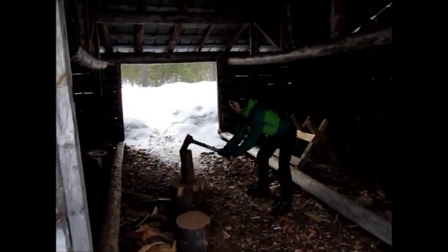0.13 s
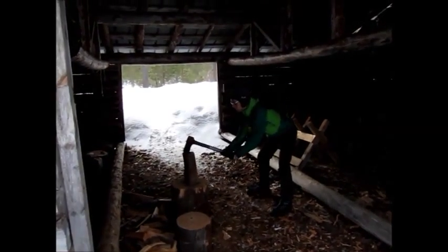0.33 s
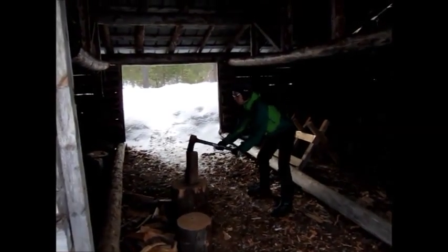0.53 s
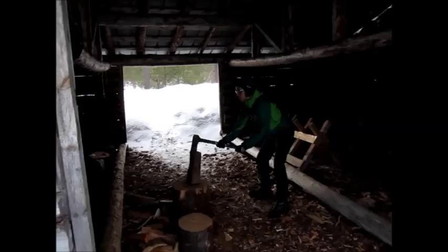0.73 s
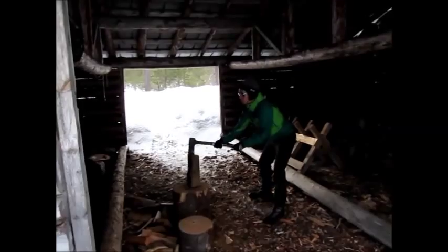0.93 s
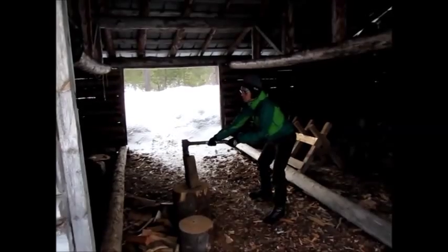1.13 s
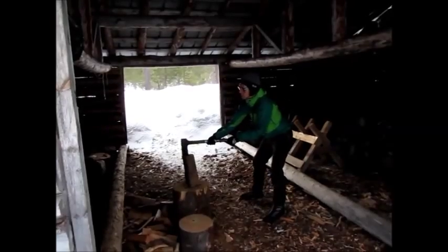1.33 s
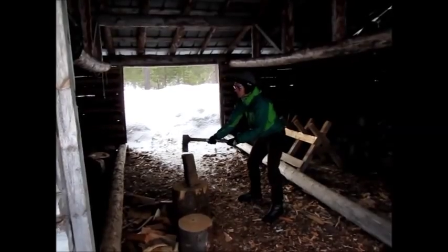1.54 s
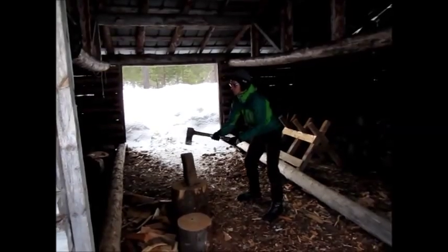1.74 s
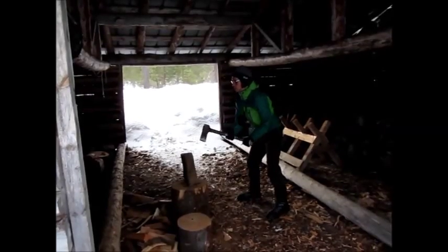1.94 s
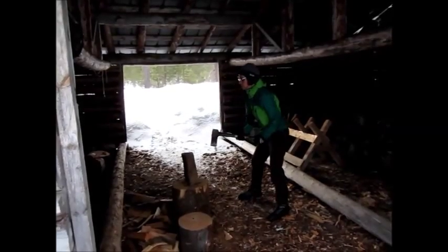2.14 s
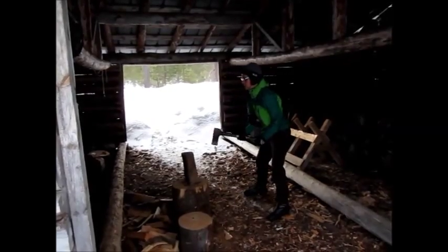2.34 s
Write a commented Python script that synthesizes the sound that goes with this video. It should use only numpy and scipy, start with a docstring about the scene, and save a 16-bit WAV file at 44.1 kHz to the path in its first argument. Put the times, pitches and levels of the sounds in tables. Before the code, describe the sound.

A sharp axe blow cracks into a log with a woody thud and short shed echo, then dry knocks as the wedged blade is levered free, ending with jacket rustle, scrapes and footsteps on bark litter.

```python
"""Wind rumble (deep filtered noise), hiss and a faint drone (noise bands) lie under an open woodshed.
An axe bites into a log on a chopping block: decaying sine tones and torn-fibre noise, echoing in the shed.
The recorder's gain ducks at the blow and creeps back, lifting the background.
Then the stuck blade is levered free with short damped knocks, among snaps of filtered noise.
Last, a jacket swishes and feet shift on bark litter: grainy noise, scrapes, crackles and dull bumps."""
import sys
import numpy as np
from scipy import signal
from scipy.io import wavfile
from scipy.ndimage import minimum_filter1d

SR = 44100
rng = np.random.default_rng(int(sys.argv[2]) if len(sys.argv) > 2 else 0)


def generate_wav(sig):
    """Save sig (samples, or channels by samples) to the path in sys.argv[1] as 16-bit PCM at SR."""
    pcm = np.round(np.clip(np.atleast_2d(sig).T, -1, 1) * 32767).astype(np.int16)
    wavfile.write(sys.argv[1], SR, pcm)


N = 105840
T = np.arange(N) / SR  # time of every sample in seconds

# Steady hiss. Each row: frequency in Hz, strength in dB per Hz (relative).
HISS_SPECTRUM = [(30, 11), (120, 6), (300, 3), (700, -9.5), (1200, -2.5), (1800, -13), (4000, -18),
                 (8000, -19.5), (16000, -27.5)]
HISS_DB = -47
# Narrow drone bands in the background. Each row: centre in Hz, width in Hz, level in dB.
DRONE_BANDS = [(947.95, 110, -51), (1202.5, 27, -58)]
# Wind on the microphone. Each row: time in seconds, level in dB.
WIND_LEVEL = [(0, -39), (.2, -45.5), (.55, -37), (1.0, -43), (1.85, -44.5), (2.03, -33), (2.2, -32.5),
              (2.4, -44.5)]
# Colour of the wind. Each row: frequency in Hz, strength in dB per Hz (relative).
WIND_SPECTRUM = [(14, 4), (30, -5), (60, -14.5), (120, -29.5), (300, -46), (1000, -72.5)]

# Jacket and boots rubbing. Each row: time in seconds, level in dB.
RUB_LEVEL = [(0, -41), (.07, -49), (.25, -58.5), (.42, -50.5), (.6, -49), (1.0, -48.5), (1.45, -50.5),
             (1.75, -54), (1.95, -47), (2.05, -47.5), (2.11, -41), (2.15, -45.5), (2.19, -49.5),
             (2.28, -43.5), (2.33, -59), (2.4, -42)]
# Colour of the rubbing. Each row: frequency in Hz, strength in dB per Hz (relative).
RUB_SPECTRUM = [(100, 3.5), (300, 2.5), (700, 12.5), (1500, 2.5), (3000, 4), (5000, -7.5), (8000, -14),
                (16000, -22.5)]
# Colour of one bright sleeve swish. Each row: frequency in Hz, strength in dB per Hz (relative).
SWISH_SPECTRUM = [(500, -28.5), (3000, -1), (6000, -5.5), (12000, -13), (16000, -22)]
SWISH_S, SWISH_WIDTH_S, SWISH_DB = 2.12, 0.03994, -46.5
# Tiny crackles of bark and fabric; their level is counted from the rubbing level.
CRACKLES_PER_S, CRACKLE_DB, CRACKLE_SPREAD_DB, CRACKLE_BAND_HZ = 110, 15, 3, (1300, 4800)

# Dull bumps of log and boots on the ground. Each row: start in seconds, level in dB.
BUMPS = [(0.279, -22), (0.778, -29.5), (1.195, -37.5), (1.491, -29), (1.973, -34.5), (2.176, -29),
         (2.343, -33)]
# Colour of the bumps. Each row: frequency in Hz, strength in dB per Hz (relative).
BUMP_SPECTRUM = [(40, 3), (100, -0.5), (220, -9.5), (400, -28), (700, -16), (3000, -71)]
BUMP_T60_S = 0.06656  # a T60 is the time to die away by 60 dB
# Gritty scrapes as the blade comes away and the boots shift.
# Each row: start in seconds, level in dB, T60 in seconds.
SCRAPES = [(1.870, -39.5, 0.03447), (1.9232, -32.5, 0.04303), (2.026, -35.5, 0.04754),
           (2.1703, -28, 0.02103)]
# Resonances of the scrapes. Each row: centre in Hz, width in Hz, level in dB.
SCRAPE_BANDS = [(834.64, 291.5, -4), (1554.2, 307.2, -6.5), (2572.5, 517.5, -6), (3053.3, 761.4, -6.5)]
SCRAPE_RISE_S, SCRAPE_GRAIN_DB, SCRAPE_GRAINS_PER_S = 0.001078, 4, 500
# Crisp snaps of single chips, and at 0.464 s a faint tink of the axe head. Each row: start in seconds, level in
# dB, centre in Hz, T60 in seconds.
CHIP_SNAPS = [(0.051, -40, 3240, 0.021), (0.283, -42, 3093, 0.0354), (0.305, -41, 3192, 0.02072),
              (0.464, -40.5, 2581, .06), (0.570, -36.5, 9040, 0.00936), (0.663, -31.5, 9342, 0.0137),
              (0.663, -31, 2580, 0.013), (0.7508, -32, 10060, 0.00527), (0.8035, -30, 2523, 0.02657),
              (0.879, -41.5, 3455, 0.10084), (0.932, -42, 11000, 0.02024), (0.977, -43.5, 3192, 0.0188),
              (1.055, -38.5, 12220, 0.01062), (1.28, -32.5, 4124, 0.009924), (1.375, -43, 5495, 0.03395),
              (1.483, -38.5, 3273, 0.04596), (1.491, -33.5, 1412, 0.12044), (1.493, -40.5, 7987, 0.01629),
              (1.534, -39.5, 9005, 0.00879), (2.062, -38, 4909, 0.01336), (2.387, -36, 3546, 0.03406)]
BURST_WIDTH = 1.7964  # band edges of snaps and splinters, as a ratio to the centre

# The wedged blade slips in the cleft.
# Each row: start in seconds, level in dB, pitch in Hz, T60 in seconds.
SLIPS = [(0.8034, -1.5, 3325, 0.00211), (0.8041, -9.5, 946.6, 0.004404), (0.8052, -17.5, 2781, 0.00809),
         (0.8715, -25.5, 647.1, 0.03388), (0.8846, 1, 1474, 0.006233), (1.0777, -7, 1483, 0.005695),
         (1.1620, -20.5, 1486, 0.006753), (1.2220, -15.5, 1028, 0.006743), (1.4908, -10, 1492, 0.002913),
         (1.4928, -12.5, 3628, 0.00208), (1.4932, -9.5, 880.5, 0.004702)]
# Tones within each slip. Each row: ratio to the slip's pitch, level in dB added to the slip's level.
SLIP_MODES = [(.62, -8), (1.04, -2.5), (1.88, -21)]
SLIP_RISE_S = 0.00054757
SLIP_ROOM_DB = -12  # share of the slips that reaches the walls

# The shed's reverberation for small sounds. Each row: frequency in Hz, strength in dB per Hz (relative).
SHED_SPECTRUM = [(100, -5.5), (400, 3.5), (1300, 2.5), (4000, -1), (16000, -0.5)]
# How long the shed rings. Each row: frequency in Hz, T60 in seconds.
SHED_T60 = [(100, .33), (350, 0.3), (700, 0.26), (1500, 0.18), (4000, .19), (12000, 0.15)]
SHED_DB, SHED_BUILD_S = -10, 0.0044
# Boards and air of the shed ring on after the blow. Each row: pitch in Hz, level in dB, T60 in seconds.
SHED_MODES = [(223.38, -15, 0.2), (322.78, -14, .23), (668.22, -14, 0.31), (764, -14.5, 0.29)]
# Diffuse tail of the blow. Each row: frequency in Hz, strength in dB per Hz (relative).
BLOW_TAIL_SPECTRUM = [(60, -4.5), (130, -5), (250, -0.5), (420, 2.5), (620, 2.5), (850, -1), (1200, -14.5),
                      (2400, -8.5), (3500, -12.5), (6000, -21.5), (14000, -34)]
BLOW_TAIL_DB = -1.5
# Roof and walls throw the knock back. Each row: delay in seconds, level in dB.
ECHOES = [(.029, -12.5), (.037, -24.5), (.069, -32), (.088, -28.5), (.113, -40.5)]

# The blade enters the log in two jerks. Each row: start in seconds, level in dB.
BITES = [(0.0770, 8), (0.079, 10)]
# Tones of the log. Each row: pitch in Hz, level in dB, T60 in seconds.
LOG_MODES = [(1000, -14.5, 0.032), (1512.8, -14.5, 0.023), (2052, -4, 0.019), (2590.5, -2.5, .024),
             (3036.2, -1.5, 0.017), (3655.1, -8, 0.013), (4062.6, -7, 0.014), (6148.3, -16, 0.014),
             (6953.7, -18, .014)]
# Fibres tearing under the blade. Each row: frequency in Hz, strength in dB per Hz (relative).
TEAR_SPECTRUM = [(300, 6), (1500, -12), (3000, 1.5), (5000, -13.5), (8000, -13.5), (16000, -31.5)]
TEAR_DB, TEAR_T60_S = -6, 0.03
# The split runs on a moment later. Each row: start in seconds, level in dB, centre in Hz, T60 in seconds.
SPLINTERS = [(0.0860, -10.5, 3280, .03), (0.1040, -9, 4000, .025)]
# Tones of the block as the log is driven onto it. Each row: pitch in Hz, level in dB, T60 in seconds.
BLOCK_MODES = [(391.01, -16, .1), (521, -7.5, 0.035), (612.96, 3, 0.034), (659.86, -17, 0.13),
               (767.26, -18.5, 0.082)]
THUD_S, THUD_DB, THUD_CONTACT_S = 0.0798, 14, 0.0007
# The weight of the blow thumps through the block into the ground.
THUMP_S, THUMP_HZ, THUMP_DB, THUMP_T60_S, THUMP_RISE_S = 0.0769, 111.07, 6, 0.055, 0.002

# The recorder's automatic gain, and its top cut.
GAIN_THRESHOLD_DB, GAIN_RANGE_DB = -16.5, 18
GAIN_ATTACK_S, GAIN_HOLD_S, GAIN_RELEASE_S = 0.002, 0.29819, 0.87928
CUTOFF_HZ = 16100


def from_db(db):
    """Turn decibels into a gain."""
    return 10 ** (np.asarray(db) / 20)


def rms_one(x):
    """Scale a sound to an average (rms) level of 1."""
    return x / np.sqrt(np.mean(x ** 2) + 1e-20)


def in_time(rows):
    """Draw straight lines between (seconds, value) points, read at every sample."""
    return np.interp(T, *np.transpose(rows))


def at_hz(points, hz):
    """Read a curve of (Hz, value) points on a log-frequency axis."""
    points = np.array(points)
    return np.interp(np.log(hz), np.log(points[:, 0]), points[:, 1])


def band_pass(x, low_hz, high_hz, order=2):
    """Keep only the part of a sound between two frequencies."""
    sos = signal.butter(order, [low_hz, high_hz], "band", fs=SR, output="sos")
    return signal.sosfilt(sos, x)


def band_noise(low_hz, high_hz, order=2):
    """White noise through a band-pass; an extra quarter second first lets the filter settle."""
    white = rng.standard_normal(N + SR // 4)
    return band_pass(white, low_hz, min(high_hz, 0.45 * SR), order)[-N:]


def bands():
    """Half-octave noises as pairs of centre in Hz and signal."""
    edges = 12 * 2 ** np.arange(0, 10.6, 0.5)
    return [(np.sqrt(low * high), band_noise(low, high)) for low, high in zip(edges, edges[1:])]


def coloured(spectrum):
    """Noise with the given spectrum, at rms 1."""
    return rms_one(sum(from_db(at_hz(spectrum, hz)) * noise for hz, noise in bands()))


def resonant_noise(rows):
    """Noise bands added up, each at its own level."""
    return sum(from_db(db) * rms_one(band_noise(hz - width / 2, hz + width / 2))
               for hz, width, db in rows)


def drift(rate):
    """A random wandering curve with the given number of random points per second."""
    knots = rng.standard_normal(N // 40)
    return np.interp(T * rate, np.arange(len(knots)), knots)


def decay(s, t60, rise_s):
    """An envelope that rises at time s and dies away by 60 dB in t60 seconds."""
    age = np.maximum(T - s, 0)
    fall = np.exp(-np.minimum(np.log(1000) * age / t60, 100))
    return (1 - np.exp(-age / rise_s)) * fall


def ring(s, hz, t60, rise_s):
    """One decaying sine tone struck at time s."""
    return decay(s, t60, rise_s) * np.sin(2 * np.pi * hz * (T - s))


def body(modes, s, rise_s):
    """All tones of a solid body struck at time s."""
    return sum(from_db(db) * ring(s, hz, t60, rise_s) for hz, db, t60 in modes)


def bursts(rows):
    """Wood fibres or bark breaking: short bursts of noise around a centre frequency."""
    total = np.zeros(N)
    for s, db, hz, t60 in rows:
        noise = rms_one(band_noise(hz / BURST_WIDTH, hz * BURST_WIDTH, order=3))
        total += from_db(db) * decay(s, t60, rise_s=0.0003) * noise
    return total


def reverberation(spectrum, s):
    """Diffuse noise that builds up at time s and dies away, each band at its own pace."""
    parts = [(hz, from_db(at_hz(spectrum, hz)) * noise) for hz, noise in bands()]
    steady_level = np.std(sum(noise for hz, noise in parts))
    tail = sum(noise * decay(s, at_hz(SHED_T60, hz), SHED_BUILD_S) for hz, noise in parts)
    return tail / steady_level


def shed(x):
    """The shed's answer to small sounds: each is smeared into a short noisy tail."""
    tail = reverberation(SHED_SPECTRUM, 0)
    return from_db(SHED_DB) * signal.fftconvolve(x, tail / np.linalg.norm(tail))[:N]


def background():
    """Steady hiss with a faint drone of narrow noise, and wind rumble that swells and sinks."""
    hiss = from_db(HISS_DB) * coloured(HISS_SPECTRUM)
    wind = from_db(in_time(WIND_LEVEL)) * coloured(WIND_SPECTRUM)
    return hiss + resonant_noise(DRONE_BANDS) + wind


def clothing(grain_db=3.0, grains_per_s=180):
    """Friction as noise: grainy rubbing that follows the movement, and one smooth swish."""
    rub_db = in_time(RUB_LEVEL) + grain_db * drift(grains_per_s)
    rub = from_db(rub_db) * coloured(RUB_SPECTRUM)
    swell = np.exp(-0.5 * ((T - SWISH_S) / SWISH_WIDTH_S) ** 2)
    swish = from_db(SWISH_DB) * swell * coloured(SWISH_SPECTRUM)
    return rub + swish


def crackle():
    """Random tiny snaps that grow louder and softer with the rubbing that causes them."""
    size_db = CRACKLE_SPREAD_DB * np.minimum(rng.exponential(1, N), 3)
    sizes = from_db(size_db) * rng.choice([-1, 1], N)
    happens = rng.random(N) < CRACKLES_PER_S / SR
    clicks = sizes * happens * from_db(CRACKLE_DB + in_time(RUB_LEVEL))
    return band_pass(clicks + 1e-18, *CRACKLE_BAND_HZ)


def bumps():
    """Soft, dull contacts with the littered ground: short bursts of low noise."""
    hits = sum(from_db(db) * decay(s, BUMP_T60_S, rise_s=0.001809) for s, db in BUMPS)
    return coloured(BUMP_SPECTRUM) * hits


def scrapes():
    """Brief grainy friction that excites a few woody resonances."""
    strokes = sum(from_db(db) * decay(s, t60, SCRAPE_RISE_S) for s, db, t60 in SCRAPES)
    grain = from_db(SCRAPE_GRAIN_DB * drift(SCRAPE_GRAINS_PER_S))
    return resonant_noise(SCRAPE_BANDS) * strokes * grain


def levering():
    """Short, heavily damped knocks of the blade in the cleft; neighbouring tones swing in opposition."""
    total = np.zeros(N)
    for s, db, hz, t60 in SLIPS:
        for k, (ratio, mode_db) in enumerate(SLIP_MODES):
            sign = (-1) ** k
            total += sign * from_db(db + mode_db) * ring(s, hz * ratio, t60, SLIP_RISE_S)
    return total


def axe_blow():
    """The blade cracks into the log, tearing fibres, and drives it onto the block; the shed answers."""
    bite_shape = sum(from_db(db) * decay(s, TEAR_T60_S, rise_s=0.00041) for s, db in BITES)
    tear = from_db(TEAR_DB) * coloured(TEAR_SPECTRUM) * bite_shape
    log = sum(from_db(db) * body(LOG_MODES, s, rise_s=0.00063) for s, db in BITES)
    thud = from_db(THUD_DB) * body(BLOCK_MODES, THUD_S, THUD_CONTACT_S)
    thump = from_db(THUMP_DB) * ring(THUMP_S, THUMP_HZ, THUMP_T60_S, THUMP_RISE_S)
    # Each echo is a later copy of the thud.
    echoes = sum(from_db(db) * np.interp(T - delay, T, thud) for delay, db in ECHOES)
    shed_ring = body(SHED_MODES, THUD_S, SHED_BUILD_S)
    tail = from_db(BLOW_TAIL_DB) * reverberation(BLOW_TAIL_SPECTRUM, THUD_S)
    return log + tear + thud + thump + bursts(SPLINTERS) + echoes + shed_ring + tail


def scene():
    """Wood and ground sounds in the shed, over clothing and background."""
    ground = bursts(CHIP_SNAPS) + scrapes() + bumps() + crackle()
    slips = levering()
    answer = shed(ground + from_db(SLIP_ROOM_DB) * slips)
    return (background() + clothing() + ground + slips + answer + axe_blow())[None]


def gain_control(x):
    """Gain drops quickly on a loud peak, holds, then recovers slowly."""
    level_db = 20 * np.log10(np.abs(x) + 1e-9)
    over_db = np.clip(level_db - GAIN_THRESHOLD_DB, 0, GAIN_RANGE_DB)
    # Hold: keep the largest excess of the last moments.
    half = int(GAIN_HOLD_S * SR / 2)
    held_db = -minimum_filter1d(-over_db, 2 * half + 1, origin=half, mode="constant")
    # Release: the cut shrinks exponentially unless a new peak lifts it.
    fall = np.exp(-T / GAIN_RELEASE_S)
    cut_db = np.maximum.accumulate(held_db / fall) * fall
    # Attack: smooth the cut so that it sets in without a jump.
    r = np.exp(-1 / (GAIN_ATTACK_S * SR))
    return x * from_db(-signal.lfilter([1 - r], [1, -r], cut_db))


def record(dry):
    """Gain control, hard limits where the sound overloads, and a steep cut of the top treble."""
    clipped = np.clip(gain_control(dry[0]), -1, 1)
    top_cut = signal.ellip(10, 0.1, 80, CUTOFF_HZ, fs=SR, output="sos")
    return signal.sosfilt(top_cut, clipped)[None]


dry = scene()
out = record(dry)
generate_wav(out)
```